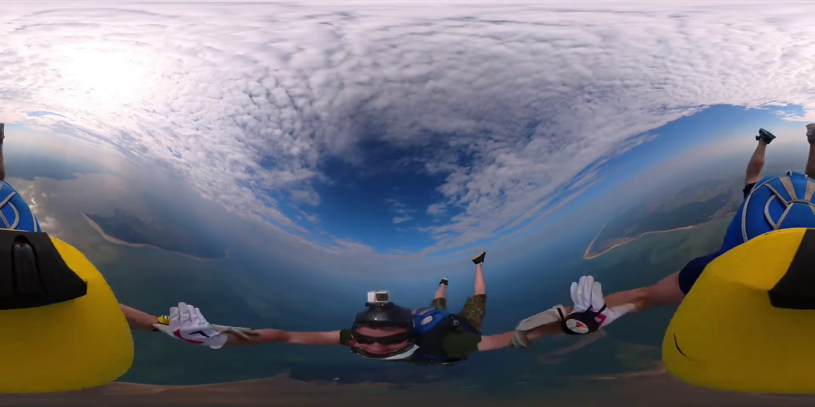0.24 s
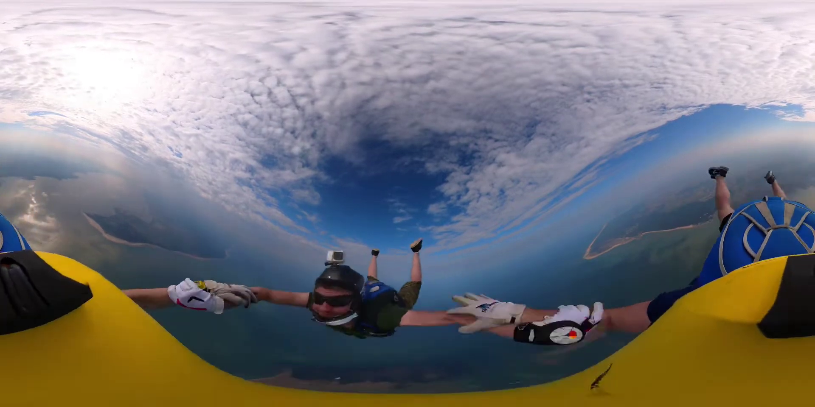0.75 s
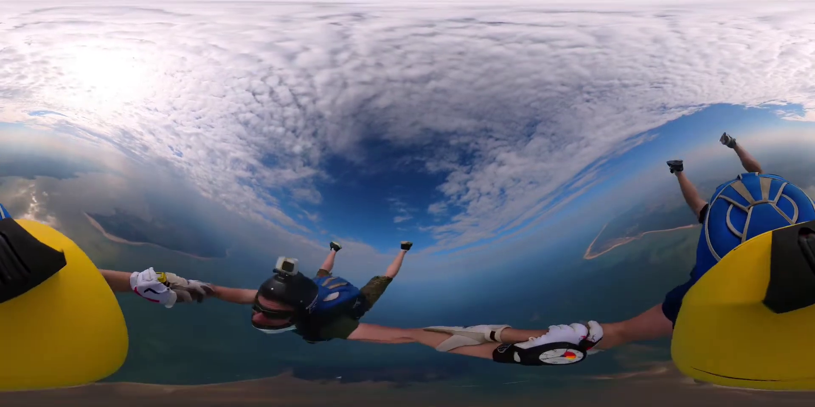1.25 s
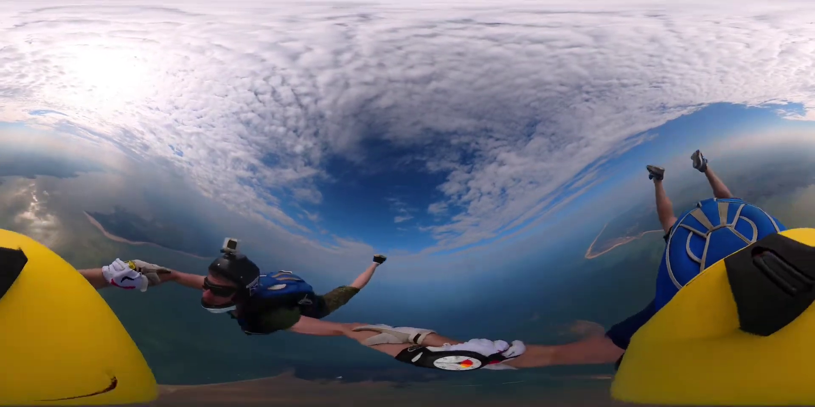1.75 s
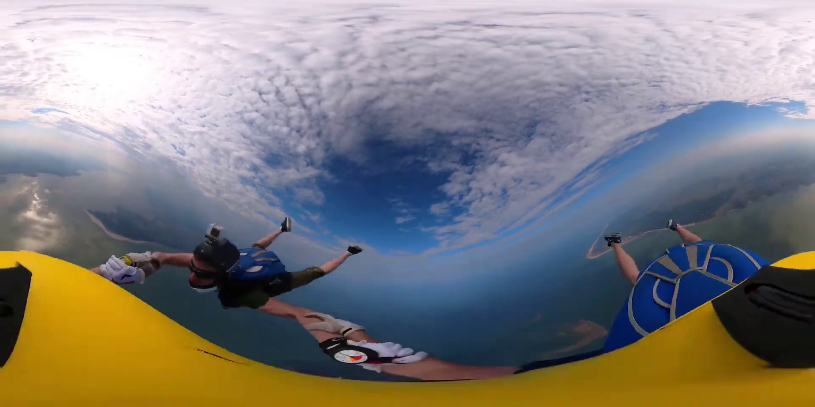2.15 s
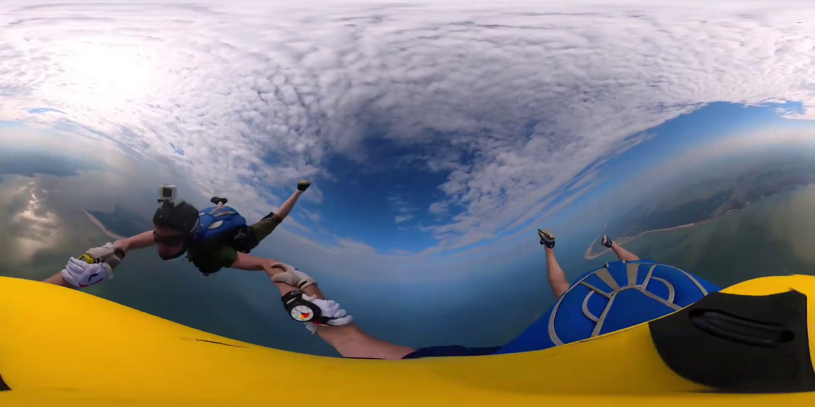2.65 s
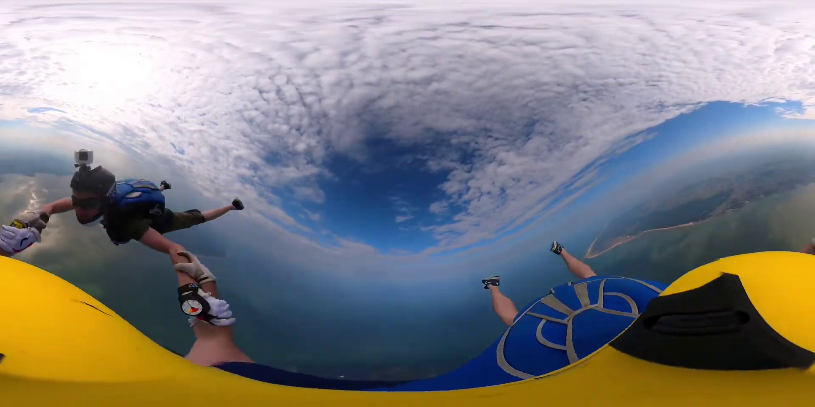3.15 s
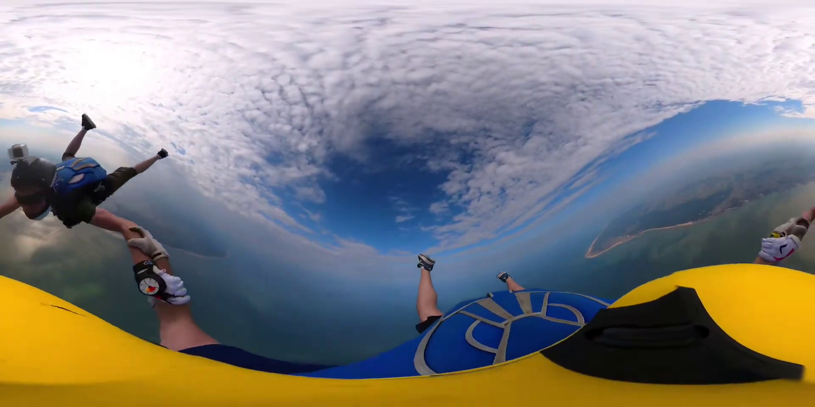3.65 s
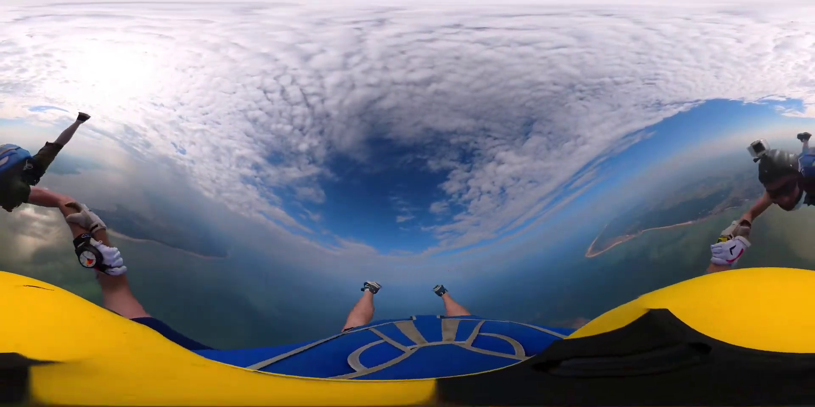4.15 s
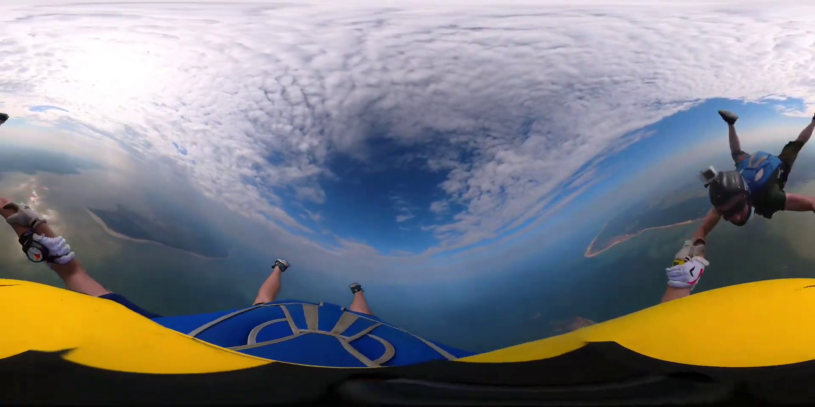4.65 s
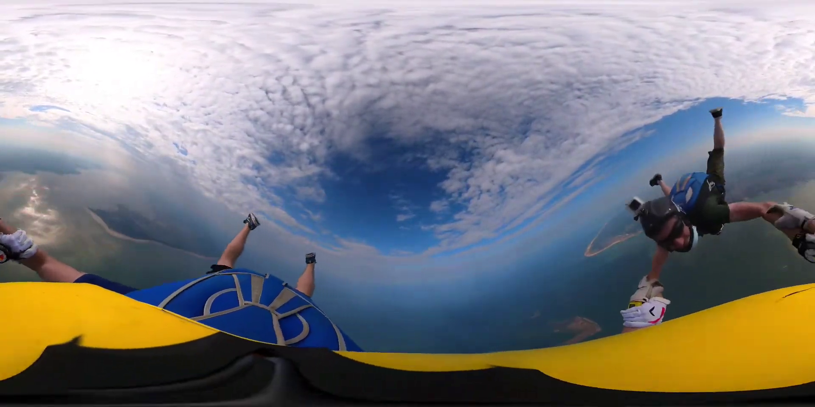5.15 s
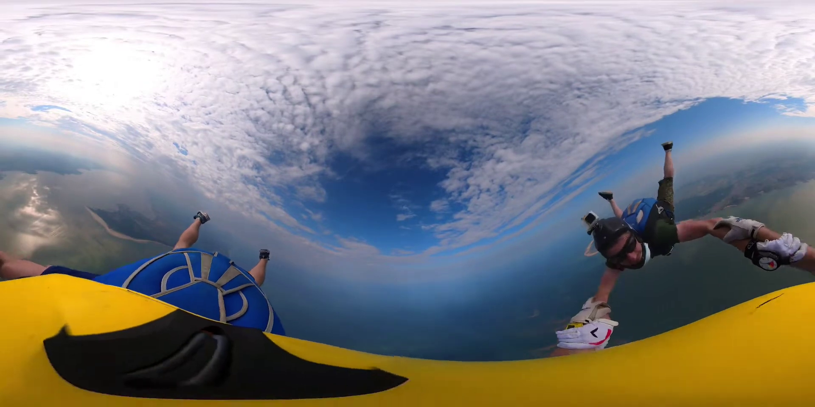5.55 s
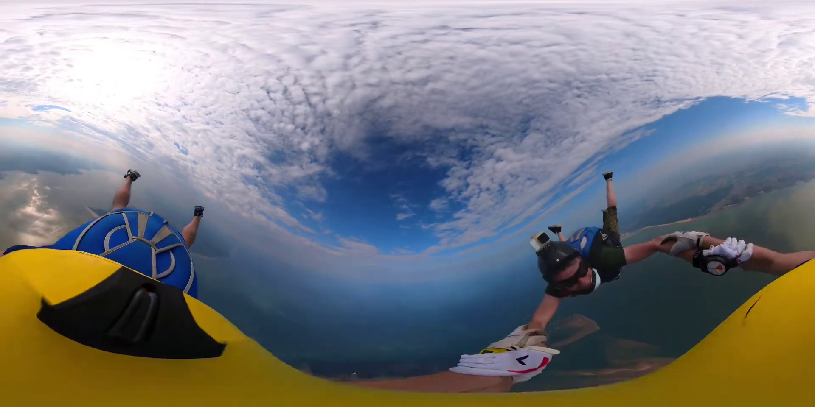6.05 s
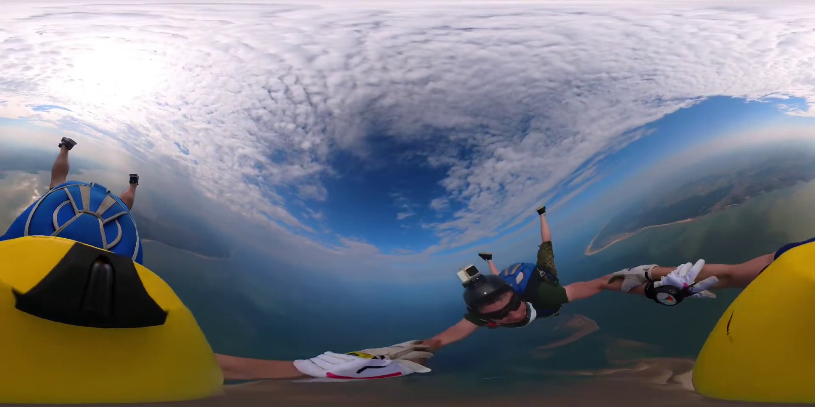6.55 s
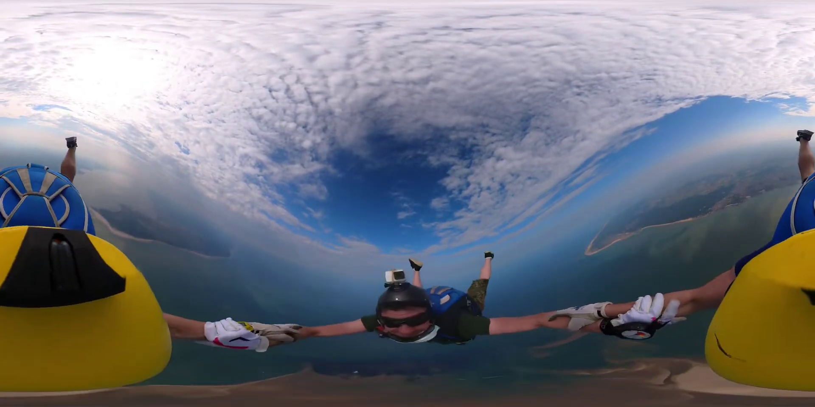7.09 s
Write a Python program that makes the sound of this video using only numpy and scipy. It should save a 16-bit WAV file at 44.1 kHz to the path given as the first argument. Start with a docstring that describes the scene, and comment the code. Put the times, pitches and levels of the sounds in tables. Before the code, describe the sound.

From 0 to about 7.3 seconds, loud freefall wind tears over a helmet camera high in open air, already at full force and never stopping. The body of the sound is a low boom, mostly bass, swelling and wavering slightly in pitch as gusts pass. Over it runs a rapid, uneven low-mid flutter, with blunt puffs breaking on the housing many times a second. Stronger bursts crowd the first three seconds, notably near 0.25, 1.85, 2.5 and 2.8. From about 3.5 to 5.5 the clear bursts come more sparsely, with tiny slack dips near 3.7, 4.5 and 4.9; firmer puffs return around 6.5 to 7.1. Everything is squeezed to a nearly constant, slightly overloaded loudness. The buffeting is alike on both sides; the left adds a steady, mottled airy rush and a very faint, narrow high hiss, while the right stays dull. It cuts off mid-roar.

```python
"""Free-fall wind on a helmet camera

Wind tears over the housing: big eddies boom on it, smaller ones flutter past in gusts and break on it.
All are shaped noise, squeezed to one ceiling by a fast limiter and heard at both ports.
The left port adds a steady rush of patchy noise and a narrow noise band near 8 kHz as a hiss.
The right port is sheltered and dull.
"""
import sys
import numpy as np
from scipy import signal
from scipy.fft import rfft, irfft, next_fast_len
from scipy.io import wavfile
from scipy.ndimage import uniform_filter1d, minimum_filter1d, map_coordinates

SR = 44100
rng = np.random.default_rng(int(sys.argv[2]) if len(sys.argv) > 2 else 0)


def digitize_waveform(pressure):
    """Quantize a signal to 16-bit integers and store it at the path in sys.argv[1].

    Rows of a 2-D input are taken as channels; values are limited to [-1, 1].
    """
    field = np.atleast_2d(pressure).T
    bounded = np.clip(field, -1, 1)
    quanta = np.round(bounded * 32767).astype(np.int16)
    wavfile.write(sys.argv[1], SR, quanta)


N = 322812
TIME_S = np.arange(N) / SR


def amp(db):
    """Amplitude factor from dB."""
    return 10 ** (np.asarray(db) / 20)


def unit(x):
    """x scaled to rms 1."""
    return x / np.sqrt(np.mean(x ** 2) + 1e-20)


def curves(rows):
    """One value per sample for each column after the time."""
    knots_s, *columns = np.transpose(rows)
    return [np.interp(TIME_S, knots_s, column) for column in columns]


def wobble(rate_hz):
    """Smooth random curve with rate_hz knots a second."""
    knots = rng.standard_normal(int(N * rate_hz / SR) + 4)
    return map_coordinates(knots, [np.arange(N) * rate_hz / SR])


def filtered(x, response):
    """x times a zero-phase response of frequency [Hz]."""
    size = next_fast_len(N + 8192)
    spectrum = rfft(x, size) * response(np.fft.rfftfreq(size, 1 / SR))
    return irfft(spectrum, size)[..., :N]


def noise(points):
    """Noise of rms 1 coloured by (frequency [Hz], level [dB]) points, 120 dB down outside them."""
    point_hz, point_db = np.transpose(points)

    def colour(hz):
        return amp(np.interp(np.log(hz + 1), np.log(point_hz + 1), point_db, left=-120, right=-120))

    return unit(filtered(rng.standard_normal(N), colour))


def patchy(x, depth_db, bins, frames):
    """x with random patches of gain in time and frequency, rescaled to rms 1."""
    z = signal.stft(x, nperseg=512)[2]
    field = uniform_filter1d(rng.standard_normal(z.shape), bins, 0)
    field = uniform_filter1d(field, frames, 1)
    mottled = signal.istft(z * amp(depth_db * unit(field)), nperseg=512)[1]
    return unit(mottled[:N])


# Ringing of the left port: (frequency [Hz], relative level [dB per Hz])
HISS_SPECTRUM = [(7500, -17.5), (7900, -5.5), (8250, 3.5), (8600, -1.5), (8950, -18.5)]


def hiss():
    """Narrow noise band of the ringing left port, slightly unsteady in level."""
    level_db = -68.5 + .4 * wobble(10) + 1.6 * wobble(40)
    return amp(level_db) * noise(HISS_SPECTRUM)


# Air stream at the left port: (frequency [Hz], relative level [dB per Hz])
RUSH_SPECTRUM = [(7.1, -45), (12, -9.5), (50, -9.5), (65, -5.5), (90, -6), (129, -6.5), (273, -1),
                 (415, -0.5), (632, -3.5), (800, -4.5), (1050, -6.5), (1450, -13), (2040, -21.5),
                 (2900, -24.5), (3830, -28), (4600, -33), (5500, -36.5), (6010, -40.5), (8360, -37.5),
                 (10000, -47), (13500, -34), (15700, -34.5)]


def rush():
    """Air streaming past the left port: finely mottled above, lumpy in its lows."""
    air = patchy(noise(RUSH_SPECTRUM), depth_db=2.8, bins=2, frames=3)
    lows = filtered(air, lambda hz: 1 / (1 + (hz / 350) ** 4))
    lumps = unit(amp(1.9 * wobble(19) + 1.4 * wobble(35)))
    stream = amp(0.78 * wobble(14)) * (air - lows) + lumps * lows
    return amp(-37.0) * stream


# Slowest eddies: (frequency [Hz], relative level [dB per Hz])
DEEP_SPECTRUM = [(20, -21), (48, -27), (62, -9), (75, -1.5), (92, 2.5), (110, 3.5), (150, -26), (220, -62)]


def deep_eddies(level_db):
    """Low noise of the slowest eddies, swelling with the gusts."""
    return amp(level_db + 1.8 * wobble(9)) * noise(DEEP_SPECTRUM)


# Housing boom at mean air speed: (frequency [Hz], relative level [dB per Hz])
BOOM_SPECTRUM = [(60, -36), (90, -12), (120, -1.5), (140, -3.5), (156, 0.5), (170, -1.5), (185, -4),
                 (212, -19.5), (300, -48.5)]


def housing_boom(pitch):
    """Eddies sweep past at a changing speed, so time-warped noise wavers in pitch."""
    travel = np.cumsum(pitch * 2 ** (.06 * wobble(22)))
    # normalised travel: only pitch relative to its mean matters
    boom = map_coordinates(noise(BOOM_SPECTRUM), [travel * (N - 1) / travel[-1]])
    return amp(-23.5 + 1.2 * wobble(30)) * boom


# Clearest eddies breaking on the housing: (start [s], hold [s], level before flicker [dB])
BREAKS = [(0.116, 0.033, -33.5), (0.234, 0.007, -22), (0.274, 0.027, -24), (0.444, 0.015, -25),
          (0.5, 0.034, -34), (0.643, 0.033, -33), (0.768, 0.023, -31.5), (0.896, 0.013, -28),
          (0.922, 0.038, -35.5), (0.979, 0.013, -33), (1, 0.014, -29.5), (1.039, 0.026, -30),
          (1.11, 0.032, -30.5), (1.249, 0.016, -25.5), (1.37, 0.018, -27), (1.458, 0.016, -26.5),
          (1.507, 0.034, -28), (1.617, 0.028, -28), (1.711, 0.039, -30), (1.777, 0.031, -25.5),
          (1.85, 0.024, -22), (1.882, 0.02, -27), (1.97, 0.014, -29), (2.185, 0.021, -30.5),
          (2.268, 0.008, -31), (2.454, 0.01, -26.5), (2.529, 0.024, -23), (2.582, 0.035, -33.5),
          (2.681, 0.024, -32), (2.748, 0.036, -31), (2.803, 0.025, -21.5), (2.878, 0.04, -28),
          (2.94, 0.043, -34), (3.026, 0.02, -30.5), (3.065, 0.015, -30), (3.187, 0.061, -30),
          (3.364, 0.029, -27.5), (3.513, 0.017, -30), (3.767, 0.035, -32), (3.925, 0.018, -27),
          (3.988, 0.012, -30.5), (4.148, 0.017, -34), (4.381, 0.028, -41.5), (4.561, 0.016, -28),
          (4.616, 0.024, -26.5), (4.936, 0.018, -29.5), (5.074, 0.023, -31), (5.393, 0.04, -33),
          (5.608, 0.044, -34.5), (5.818, 0.0175, -34), (5.862, 0.043, -29), (6.072, 0.017, -33.5),
          (6.166, 0.025, -30), (6.442, 0.051, -30.5), (6.524, 0.0088, -27), (6.691, 0.015, -26),
          (6.834, 0.01, -28), (6.95, 0.014, -24.5), (7.153, 0.0089, -25), (7.185, 0.092, -34.5)]
SMALL_PER_S, SMALL_HOLD_S, SMALL_SPREAD_DB = 16, .005, 2.5  # spread: standard deviation
RISE_TAU_S, T60_S = .002, .03


def breaking_eddies(flutter_db):
    """Envelope of listed and random small breaks: exponential rise, hold, exponential fall."""
    when, size = rng.random((int(SMALL_PER_S * N / SR), 2)).T
    scatter_db = SMALL_SPREAD_DB * np.sqrt(12) * (size - .5)
    small_db = flutter_db[(when * N).astype(int)] + scatter_db
    small = np.c_[when * N / SR, np.full(len(when), SMALL_HOLD_S), small_db]
    t = np.arange(SR // 5) / SR
    swell = np.zeros(N + SR)
    for start_s, hold_s, db in np.r_[BREAKS, small]:
        fall_db = 60 * np.maximum(t - hold_s, 0) / T60_S
        rise = 1 - np.exp(-t / RISE_TAU_S)
        swell[round(start_s * SR):][:len(t)] += amp(db - fall_db) * rise
    return swell[:N]


# Flutter falls slack, or rises where positive: (middle [s], half length [s], level change [dB])
LULLS = [(0.502, 0.013, 1), (0.802, 0.03, -4), (1.212, 0.022, -2.5), (2.005, 0.017, 0), (2.088, 0.017, -7),
         (2.173, 0.024, -6), (2.438, 0.04, -6.5), (2.873, 0.03, -7), (3.062, 0.012, -3), (3.192, 0.019, -1),
         (3.445, 0.014, -5), (3.677, 0.01, -4), (3.697, 0.03, -7.5), (3.743, 0.0097, -11),
         (4.237, 0.03, -7.5), (4.347, 0.025, -7.5), (4.488, 0.023, -4), (4.524, 0.022, -11),
         (4.766, 0.023, -3), (4.904, 0.03, -13), (4.966, 0.022, -11), (5.303, 0.025, 0.5), (5.34, 0.01, -3),
         (5.534, 0.014, -5), (5.597, 0.007, -7), (5.987, 0.023, -10), (6.038, 0.03, -4), (6.71, 0.018, -6),
         (6.986, 0.014, -4), (7.061, 0.048, -9), (7.192, 0.025, -13)]
SLACK_S, SLACK_DB = 0.0089, -7  # ramp just before each listed break


def flutter_slack():
    """Flutter level change [dB]: ramps down into the listed breaks, cosine-squared lulls between."""
    slack_db = np.zeros(N)
    for start_s, _, _ in BREAKS:
        before = slice(round((start_s - SLACK_S) * SR), round(start_s * SR))
        slack_db[before] += SLACK_DB * (1 - (start_s - TIME_S[before]) / SLACK_S)
    for middle_s, half_s, db in LULLS:
        near = slice(round((middle_s - half_s) * SR), round((middle_s + half_s) * SR))
        slack_db[near] += db * np.cos(np.pi / 2 * (TIME_S[near] - middle_s) / half_s) ** 2
    return uniform_filter1d(slack_db, size=40)


# Smaller eddies: (frequency [Hz], relative level [dB per Hz])
FLUTTER_SPECTRUM = [(120, -33), (200, 3), (300, -1), (450, -6), (800, -18), (1300, -31), (2200, -46),
                    (4000, -59), (8000, -71.5), (15000, -80.5)]
# Flutter between the breaks, before flicker: (time [s], level [dB])
FLUTTER_LEVEL = [(0, -32.5), (1, -32.5), (2, -31.5), (3, -34), (4, -32.5), (5, -34), (6, -33),
                 (7.32, -33.5)]
STEADY_DB = -7  # part that never flickers, re flutter level
SPLIT_HZ = 470  # larger and finer eddies flicker partly on their own


def flutter():
    """Noise of smaller eddies in two bands, flickering fast and swelling as eddies break."""
    flutter_db, = curves(FLUTTER_LEVEL)
    breaks = breaking_eddies(flutter_db)
    base = amp(flutter_db + flutter_slack())
    shared_db = 2.4 * wobble(65) + 2.8 * wobble(130)
    all_eddies = noise(FLUTTER_SPECTRUM)
    large = filtered(all_eddies, lambda hz: 1 / (1 + (hz / SPLIT_HZ) ** 4))
    total = 0
    for eddies in (large, all_eddies - large):
        own_db = 1.0 * wobble(50) + 2.3 * wobble(130) + 2.2 * wobble(280)
        strokes = base * np.hypot(amp(shared_db + own_db), amp(STEADY_DB))
        flickering_breaks = amp(0.24 * shared_db + 0.36 * own_db) * breaks
        total = total + (strokes + flickering_breaks) * eddies
    return total


# Gusts: (time [s], deep-eddy level before drive [dB], nominal boom pitch [Hz], used relative to its mean)
GUSTS = [(0, -32, 141.9), (.5, -31.5, 149), (1, -31, 142), (1.5, -35, 148.1), (2, -29.5, 140.1),
         (2.4, -30.5, 144.8), (2.8, -32, 153), (3.3, -30.5, 151.9), (3.7, -31.5, 146.2),
         (4.1, -31.5, 143.2), (4.55, -30, 132.1), (5, -29, 140), (5.3, -32, 149.9), (5.7, -27.5, 138),
         (6.1, -30.5, 140.9), (6.5, -32.5, 147), (6.95, -28.5, 134), (7.32, -31.5, 143.1)]


def buffet():
    """Pressure of all eddies on the housing, alike at both ports."""
    deep_db, boom_pitch = curves(GUSTS)
    return deep_eddies(deep_db) + housing_boom(boom_pitch) + flutter()


def limiter(x, ceiling_db, hold_ms, glide_ms, firmness):
    """Look-ahead gain that holds swings near the ceiling; the tallest get a little past it."""
    needed = np.minimum(1, amp(ceiling_db) / (np.abs(x) + 1e-9)) ** firmness
    gain = minimum_filter1d(needed, int(hold_ms * SR / 1000))
    for _ in range(3):
        gain = uniform_filter1d(gain, int(glide_ms * SR / 1000))
    return gain * x


DRIVE_DB = 1.5  # gain ahead of the limiter


def scene():
    """Limited buffet at both ports (left, right); rush and hiss at the left only."""
    squeezed = limiter(amp(DRIVE_DB) * buffet(), ceiling_db=-18.0, hold_ms=4.5, glide_ms=1.6, firmness=0.82)
    # left port passes a little less of the flutter's upper part
    left = filtered(squeezed, lambda hz: 0.955 / (1 + (hz / 2500) ** 4) + 0.036 / (1 + (hz / 400) ** 4))
    return np.array([left + rush() + hiss(), squeezed])


TOP_HZ = 15720  # band limit


def record(dry):
    """Input stage rounds off the tallest swings, then cuts all above the band limit."""
    rounded = dry / (1 + np.abs(dry / .16) ** 8) ** (1 / 8)
    return filtered(rounded, lambda hz: hz < TOP_HZ)


dry = scene()
out = record(dry)
digitize_waveform(out)
```